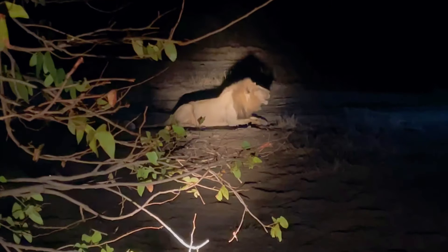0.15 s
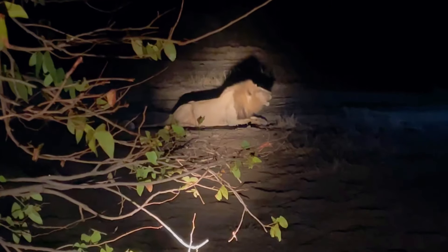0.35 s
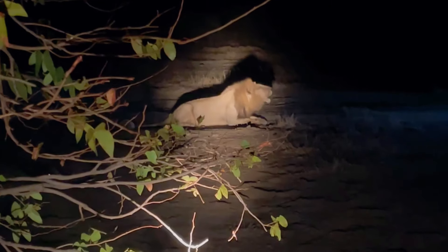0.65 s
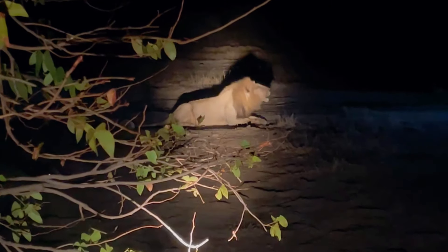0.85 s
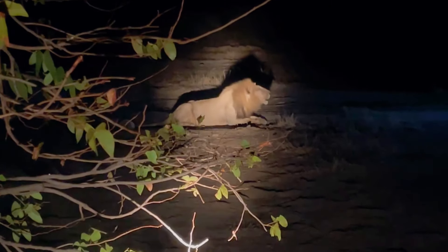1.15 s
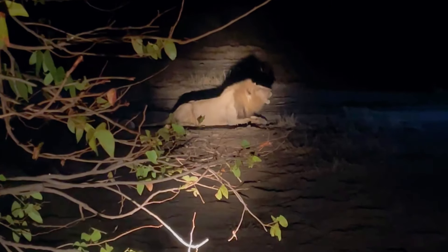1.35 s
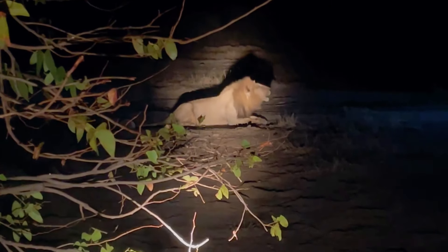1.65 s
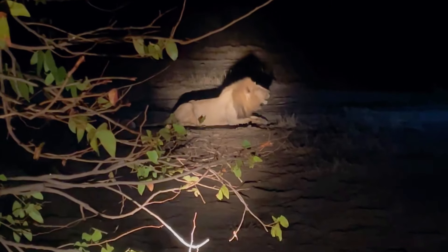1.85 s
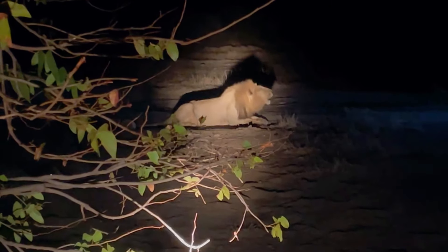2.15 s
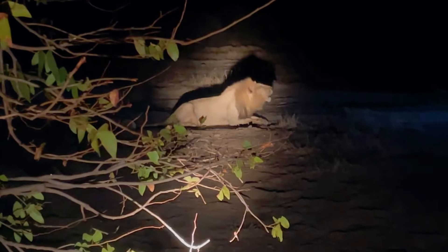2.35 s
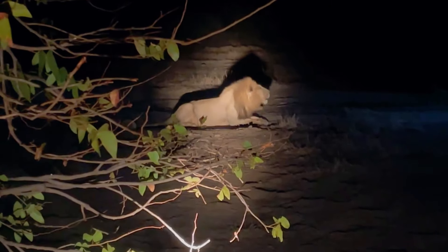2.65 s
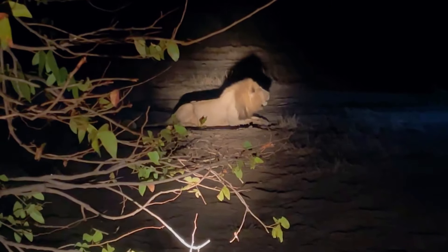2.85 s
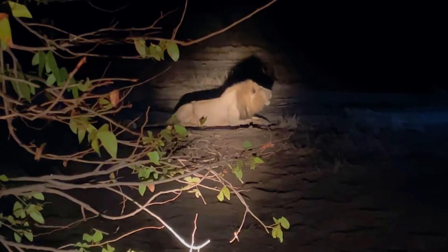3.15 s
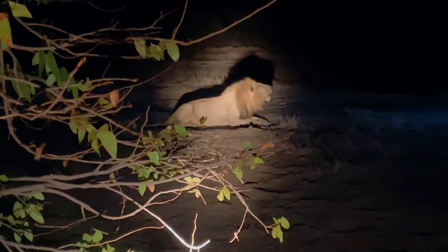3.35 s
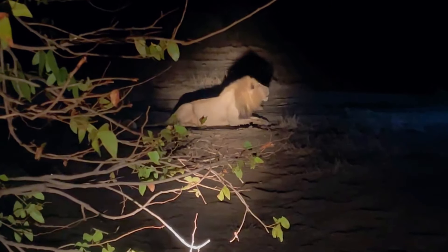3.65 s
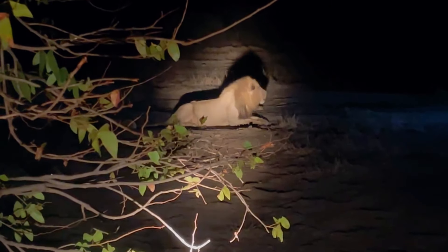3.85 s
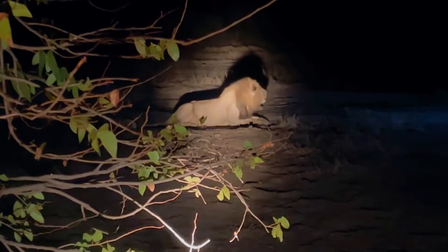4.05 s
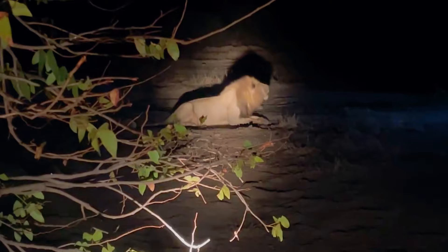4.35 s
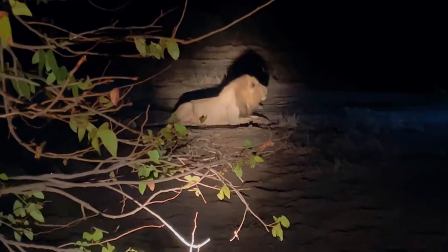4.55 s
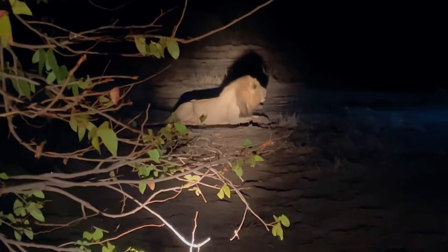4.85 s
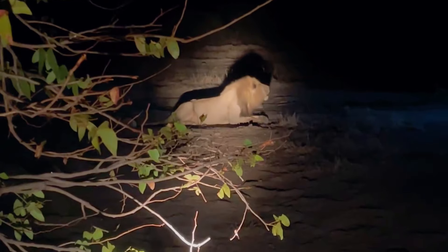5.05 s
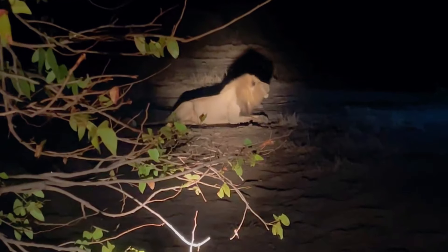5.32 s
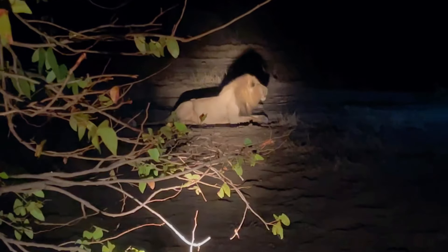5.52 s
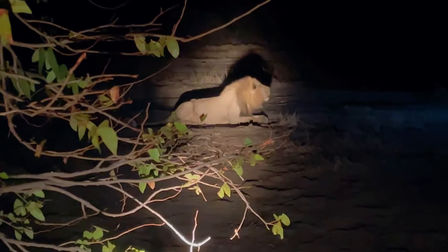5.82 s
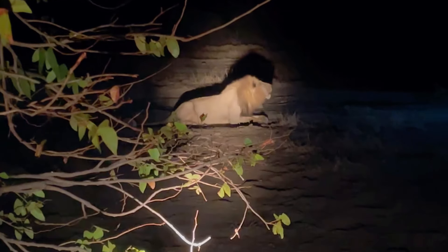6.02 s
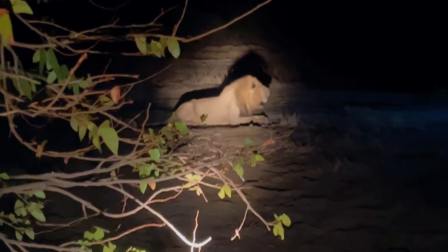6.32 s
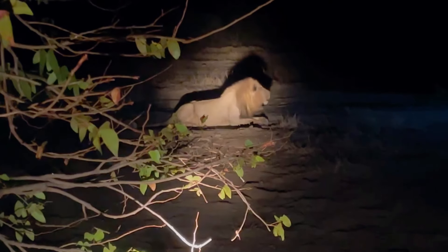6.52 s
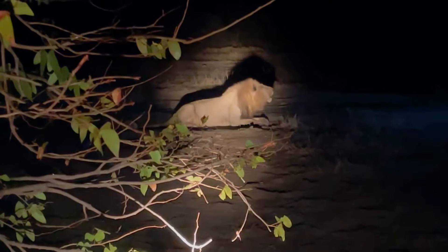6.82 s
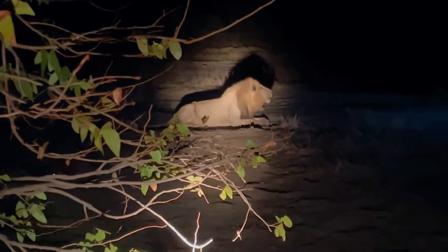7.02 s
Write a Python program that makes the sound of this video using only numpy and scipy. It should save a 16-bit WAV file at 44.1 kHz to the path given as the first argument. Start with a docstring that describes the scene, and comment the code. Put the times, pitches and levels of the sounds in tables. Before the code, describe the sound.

Quiet open bush at night, with faint low rumble and slight microphone hiss. The tail of an earlier growl dies away in the first 0.3 s, with small hollow pips around 0.1 and 0.2 s and a soft falling knock near 0.27 s. A close lion then grunts at about 0.45, 1.3, 2.1, 3.1, 4.1, 5.0 and 5.8 s, each preceded by a short snorted, snoring intake. Every grunt leaps into a deep tone near 145 Hz, swells within a tenth of a second, then sinks and breaks into slow flapping growl pulses, with throaty, nasal rough air. The one at 5.8 s sags lower into a longer rattle. At 6.6 s a last, much weaker grunt comes without an intake, all growl, ending near 7 s. A long, low, faint echo follows the calls, while frog-like pips near 740 Hz tick sparsely, slightly left, in the gaps.

```python
"""Night in open bush: the last growl of an earlier grunt dies away, short hollow pips and a soft knock are heard.
A lion then gives a run of deep grunts, all but the last after a short snorted intake of air. In all but the
last, a low tone leaps up, swells, and gives way to slow growl pulses; the last is weak and growl throughout.
Rough air rings throat and nose; the bush returns a long low echo, over a faint night rumble with more pips.
Tone is a wandering sine, growl is pulses through resonances, air is gusty noise, echo is sparse reflections."""
import sys
import numpy as np
from scipy import signal
from scipy.fft import rfft, irfft, next_fast_len
from scipy.io import wavfile
from scipy.ndimage import uniform_filter1d, minimum_filter1d

SR = 44100
rng = np.random.default_rng(int(sys.argv[2]) if len(sys.argv) > 2 else 0)


def transcribe(u):
    """Save the signal u as a 16-bit wav file named by the first command-line argument.

    u: samples, shape (n,) or (channels, n), limited to [-1, 1]; the rate is SR.
    q: integer samples, one column per channel.
    """
    v = np.clip(np.atleast_2d(u).T, -1, 1)
    q = np.round(v * 32767).astype(np.int16)
    wavfile.write(sys.argv[1], SR, q)


N = 316632

# grunts: (start [s], full effort [s], break [s], fade [s], effort at its full [dB], at the break [dB],
#   after the break [dB], pitch at full effort [Hz], at the break [Hz], at the fade [Hz], throat rasp [dB],
#   nose rasp [dB], hiss [dB], boost of nose resonances above 1 kHz [dB], effort after the leap [dB], release [s],
#   length of the break [s], effort at the fade [dB], effort under which tone gives way to growl [dB])
GRUNT_ROWS = [(.45, 0.558, 0.69, .81, -6, -4.5, -16.5, 146.8, 134.3, 126, -26, -26, -40, -2, -17, .08, 0.033, -22.5, -11.5),
              (1.299, 1.431, 1.437, 1.59, -5, -4, -9.5, 148.2, 144.6, 135, -25, -28, -39.5, -0.5, -15, 0.084, 0.019, -19, -13),
              (2.119, 2.275, 2.412, 2.5, -4, -14.5, -23.5, 145.1, 124, 136, -26, -25.5, -40.5, -1.5, -15, .08, .045, -30.5, -14),
              (3.099, 3.24, 3.455, 3.59, -4.5, -8, -18, 152.9, 134, 100, -24, -27.5, -44, -1, -14, .1, 0.039, -25, -10.5),
              (4.118, 4.229, 4.29, 4.455, -7, -8, -17.5, 145.6, 130, 112, -22.5, -32, -44, -0.5, -17, .06, 0.066, -23.5, -15.5),
              (4.979, 5.071, 5.205, 5.31, -7, -8, -19.5, 162.8, 138, 122, -25, -35.5, -50, 1.5, -12.5, 0.09, .04, -22.5, -12.5),
              (5.821, 5.933, 6.05, 6.335, -6.5, -9.5, -22, 139.3, 133, 73, -24.5, -33.5, -49.5, 1.5, -16, .04, 0.085, -34.5, -15.5),
              (6.632, 6.739, 6.79, 6.89, -22, -27, -31.5, 132.4, 128, 131, -30, -32.5, -44.5, 3, -28.5, .11, .03, -31.5, -14)]
# last growl of an earlier grunt: (length [s], effort [dB], fade [dB/s], pitch [Hz],
#   throat rasp, nose rasp, hiss re effort [dB])
EARLIER_GROWL = (0.3, -41, 116, 149, -12, -24, -44.5)
# brief dips of the tone: (time [s], depth [dB], length [s])
TONE_CATCHES = [(.636, 11.5, 0.0035), (1.419, 6.5, 0.01), (1.481, 8, 0.0083), (1.541, 7, .0042),
                (2.195, 7, .011), (2.23, 4, .011), (3.185, 10, .012), (3.233, 7, .013), (3.35, 9.5, .0041),
                (4.206, 17.5, 0.005), (4.256, 7.5, 0.0049), (4.323, 7, 0.0039), (5.053, 8, 0.0072),
                (5.096, 6, .022), (5.11, 11, .0073), (5.148, 12, .0076), (5.169, 6.5, .0036),
                (5.214, 22.5, .012), (5.895, 7.5, .005), (5.919, 21, 0.0054), (5.973, 12.5, .006),
                (5.996, 7, .012), (6.084, 7.5, 0.012), (6.131, 12.5, 0.013)]
# harsh bursts of air, and lulls: (time [s], throat change [dB], nose change [dB], hiss change [dB], length [s])
AIR_BURSTS = [(0.492, 1, 1, 1.5, .04), (0.587, -3, 2, 3, 0.035), (0.665, 2, -2.5, -3, 0.061),
              (0.706, 4, 6, 5.5, 0.064), (0.781, 5, 4.5, 6, 0.048), (0.822, 5, -1.5, -2, .05),
              (1.329, -0.5, 7, 4.5, 0.022), (1.432, 6, 9, 6, 0.07), (1.545, 4, 11.5, 6.5, 0.045),
              (1.585, 5.5, -3, -5.5, 0.036), (2.181, 6.5, 2, 2, 0.015), (2.384, 5.5, 8.5, 9.5, .04),
              (2.448, 5, -1.5, -1.5, 0.066), (2.506, -3.5, 6.5, 7, 0.057), (3.148, -1.5, -1, 2.5, .03),
              (3.22, 1, 6, 4.5, 0.033), (3.267, 3, 5.5, 6, 0.08), (3.426, 7, 10.5, 10, .06),
              (3.506, 6.5, 8.5, 9.5, 0.087), (4.244, 1.5, 5.5, 1.5, 0.073), (4.338, 4, 5, 6.5, 0.037),
              (4.444, -1, 0, 2.5, .04), (4.476, 10, 8, -2, 0.026), (5.057, -1.5, 6, 0, 0.017),
              (5.18, 10.5, 15.5, 14.5, .045), (5.276, 2.5, 2.5, 10, 0.087), (5.322, 7.5, 4.5, 2, 0.058),
              (5.852, 0.5, 3.5, 5, .012), (5.893, 5, 8, 2.5, .03), (5.956, 3.5, -0.5, 1, .04),
              (6.009, 6, 11.5, 11, 0.0487), (6.079, -6.5, -3.5, 4.5, 0.077), (6.136, 5.5, 9.5, 10.5, 0.045),
              (6.213, 9.5, 9, -8.5, 0.03), (6.25, -4, -7.5, -14, 0.052), (6.286, 4.5, 7.5, -14, 0.022),
              (6.32, 11, 3, -15, 0.022), (6.687, 2, 4.5, -0.5, 0.009), (6.721, 8, 10, 1.5, 0.025),
              (6.759, 4, 7.5, 2.5, 0.06), (6.784, 8.5, 4, 0.5, 0.0203), (6.857, 5, 7, 6.5, 0.054)]
# intakes of air: (start [s], strongest [s], end [s], nose air [dB], snore [dB], snore pitch [Hz])
INTAKE_ROWS = [(0.289, 0.368, .445, -46, -32, 118), (1.15, 1.197, 1.27, -48.5, -36.5, 145.5),
               (1.971, 2.017, 2.085, -46.5, -38, 135.7), (2.893, 3.009, 3.08, -45.5, -30, 149.2),
               (4.009, 4.038, 4.09, -57.5, -41, 137.3), (4.852, 4.896, 4.96, -51.5, -33, 136.1),
               (5.721, 5.752, 5.81, -55, -41, 143)]
# throat resonances: (centre [Hz], pole width [Hz], level [dB])
THROAT_MODES = [(257.2, 54, 3.5), (345, 73, 2), (423, 40, 0.5), (526, 64, -1)]
# nose resonances: (centre [Hz], pole width [Hz], level [dB])
NOSE_MODES = [(690.2, 56, -0.5), (730, 93, -7.5), (810, 27, -1.5), (896, 100, -8.5), (1039.3, 65, -5.5),
              (1174, 91, -9), (1293, 120, -15.5)]
# resonances at the teeth: (centre [Hz], pole width [Hz], level [dB])
TEETH_MODES = [(2440, 1600, -2), (2860, 140, -0.5), (3296, 590, -3.5), (4900, 1000, -6)]
# relative spectrum of the breath hiss: (frequency [Hz], density [dB per Hz])
HISS_SPECTRUM = [(880, -37.5), (1500, 6), (1810, 0), (2210, 3), (2860, -4), (4220, -3), (5010, -18),
                 (5720, -11), (7250, -11), (8600, -21.5), (12700, -21.5), (14500, -42.5)]
# phase-shifted share between the microphones: (frequency [Hz], share [dB])
LEAD_SHARE = [(60, -14.5), (250, -15), (700, -9), (1500, -10), (6000, -3.5), (14000, -0.5)]
# scattered share, opposite in left and right: (frequency [Hz], share [dB])
SCATTER_SHARE = [(300, -25.5), (700, -11), (2000, -9.5), (5000, -7), (8000, -1.5), (14000, -4)]
# decay of the bush echo: (frequency [Hz], T60 [s])
BUSH_T60 = [(60, 1.1), (140, 1.14), (250, 1.2), (700, 0.23), (1500, 1.6), (5000, 0.58)]
# hollow pips, perhaps a frog: (time [s], approximate peak before panning [dB])
PIP_EVENTS = [(0.109, -53), (0.204, -55), (0.941, -57), (1.045, -56), (1.136, -52.5), (1.219, -63),
              (1.709, -53), (1.889, -65), (2.804, -49.5), (2.892, -55), (3.718, -56.5), (3.811, -57),
              (3.912, -52.5), (4.003, -53), (4.555, -54), (4.641, -53.5), (4.729, -58.5), (4.837, -52.5),
              (5.604, -56), (5.657, -48.5), (6.404, -54.5), (6.509, -61)]
# soft knock: (time [s], level before its soft onset [dB], start pitch [Hz], end pitch [Hz],
#   glide time constant [s], T60 [s])
KNOCK = (.267, -13, 700, 88, .004, .11)
# relative spectrum of the night: (frequency [Hz], density [dB per Hz])
NIGHT_SPECTRUM = [(18, -33.5), (30, -15.5), (80, 8), (112, -19), (161, -17), (503, -29.5), (780, -10),
                  (911, -22.5), (1210, -33), (1930, -42.5), (2080, -45), (4770, -47), (5870, -50),
                  (12700, -47), (14500, -51)]
# left-right likeness of the night: (frequency [Hz], correlation [0-1])
NIGHT_LIKENESS = [(60, 0.55), (240, 0.48), (930, 0.2), (3660, 0.66), (14400, 0.11)]

SILENT_DB, ATTACK_S, RELEASE_DB = -45.5, 0.043, 28
LEAD_S, LEAD_DB = 0.035, -20  # faint breath ahead of the leap
AIR_START_DB = -24  # rasp at the leap, re its level
ONSET_SHARP = 1.05  # onset pitch re pitch at full effort
EARLY_SHARE = 0.29  # how far throat and nose rasp follow effort before its full
# (attack [s], share of the fall in effort, loss as breath runs out [dB/s])
THROAT_LAW, NOSE_LAW, HISS_LAW = (0.035, 0.87, 18), (0.038, 0.61, 35.4), (0.04, 0.85, 10)
SNORE_LAG_S, INTAKE_START_DB, INTAKE_END_DB = 0.022, -16, -20.5
INTAKE_THROAT_DB, INTAKE_HISS_DB = -2, -11.5  # re nose air
BUSH_DB, NIGHT_DB = -36, -56
PIP_HZ = 733  # lowest pip pitch
EDGE_HZ = 14900  # upper band limit


def grunt(start_s, full_s, break_s, fade_s, full_db, break_db, after_db, full_hz, break_hz, fade_hz,
          throat_db, nose_db, hiss_db, upper_db, leap_db, release_s, breaking_s, fade_db, growl_below_db):
    """Effort leaps to its full, drops at the break and lets go; rasp sinks as the breath runs out."""
    t = np.arange(start_s - LEAD_S, fade_s + release_s, 1 / SR)
    effort_s = [start_s, start_s + ATTACK_S, full_s, break_s, break_s + breaking_s, fade_s, fade_s + release_s]
    onset_db = min(SILENT_DB, full_db - RELEASE_DB)
    levels_db = [onset_db, leap_db, full_db, break_db, after_db, fade_db, fade_db - RELEASE_DB]
    effort_db = np.interp(t, effort_s, levels_db)
    effort_db += np.interp(t, [start_s - LEAD_S, start_s], [LEAD_DB, 0])
    pitch_hz = np.interp(t, [start_s, full_s, break_s, fade_s], [ONSET_SHARP * full_hz, full_hz, break_hz, fade_hz])

    # throat and nose rasp are strong early; hiss follows effort throughout
    fall_db = effort_db - full_db
    late_db = fall_db * np.where(t > full_s, 1, EARLY_SHARE)
    parts = [(throat_db, late_db, THROAT_LAW), (nose_db, late_db, NOSE_LAW), (hiss_db, fall_db, HISS_LAW)]
    rasp_db = []
    for column, (level_db, air_db, (attack_s, share, loss_db_per_s)) in enumerate(parts, start=1):
        rise_s = [start_s - LEAD_S, start_s, start_s + attack_s]
        rise_db = np.interp(t, rise_s, [AIR_START_DB + LEAD_DB, AIR_START_DB, 0])
        burst_db = bumps(t, [(row[0], row[column], row[-1]) for row in AIR_BURSTS])
        rasp_db.append(level_db + rise_db + share * air_db - loss_db_per_s * (t - start_s) + burst_db)
    return call(t, effort_db, pitch_hz, *rasp_db, upper_db=upper_db, growl_below_db=growl_below_db)


def intake(start_s, top_s, end_s, air_db, snore_db, snore_hz):
    """Air drawn through the nostrils rings their upper resonances more; a low snore follows just behind."""
    t = np.arange(start_s, end_s + SNORE_LAG_S, 1 / SR)
    shape_s, shape_db = np.array([start_s, top_s, end_s]), [INTAKE_START_DB, 0, INTAKE_END_DB]
    air_db = air_db + np.interp(t, shape_s, shape_db)
    snore_db = snore_db + np.interp(t, shape_s + [0, SNORE_LAG_S, SNORE_LAG_S], shape_db)
    return call(t, snore_db, snore_hz, air_db + INTAKE_THROAT_DB, air_db, air_db + INTAKE_HISS_DB, upper_db=8.0)


def earlier_growl(length_s, level_db, fade_db_per_s, hz, *rasp_db):
    """The dying end of the grunt before: growl and rasp fall together."""
    t = np.arange(0, length_s, 1 / SR)
    effort_db = level_db - fade_db_per_s * t
    return call(t, effort_db, hz, *(effort_db + under_db for under_db in rasp_db))


def call(t, effort_db, hz, throat_db, nose_db, hiss_db, upper_db=0, growl_below_db=-12.0, span_db=6.5):
    """One breath: steady tone at high effort, growl pulses at low effort, rough air on top."""
    # tense folds lock to the throat while a strong breath builds; slack ones flap slowly
    building = (t < t[np.argmax(effort_db)]) & (effort_db.max() > growl_below_db)
    growl = np.clip((growl_below_db - effort_db) / span_db, 0, 1) * ~building

    # a catch dips the tone and raises its pitch 2.7 Hz per dB
    catch_db = bumps(t, TONE_CATCHES)
    cycles = np.cumsum(hz * (1 + 0.027 * wander(t, 63)) + 2.7 * catch_db) / SR
    tone = np.sqrt(2) * gain_of(0.7 * wander(t, 40) - catch_db) * np.sin(2 * np.pi * cycles)
    # uneven cycles spread above the tone
    flutter = evened(resonate(rng.standard_normal(len(t)), 1.293 * hz, 44, order=2))

    # slow slaps ring the lowest resonance and thud in the chest
    slaps = np.cumsum(31 * (1 + 0.27 * wander(t, 30))) / SR
    pulses = np.diff(np.floor(slaps), prepend=0) * gain_of(2.2 * wander(t, 40))
    pulses = evened(pulses) + 0.22 * rng.standard_normal(len(t))
    rung = evened(resonate(pulses, hz, 62, order=2))
    chest = evened(resonate(pulses, 0.68 * hz, 55, order=3))
    voice = np.sqrt(1 - growl) * tone + 0.21 * flutter
    voice += np.sqrt(growl) * (0.96 * rung + 0.24 * chest) + 0.0083 * chest

    # air puffs with every cycle, with every slap, and in uneven gusts
    puffs = (1 + 0.15 * np.cos(2 * np.pi * cycles)) * (1 + 1.1 * growl * np.exp(-(slaps % 1) / 0.3))
    air = evened(puffs * gain_of(1.7 * wander(t, 34)) * rng.standard_normal(len(t)))
    # one click a cycle gives faint overtones
    closures = evened(np.diff(np.floor(cycles), prepend=0)) * (1 - growl)
    buzz = air + 0.8 * closures
    hiss = evened(colour(air, HISS_SPECTRUM)) + 0.5 * ring(air, TEETH_MODES, t, patchy_db=2.6, drift=0.025)
    nose_modes = [(f, width, db + upper_db * (f > 1000)) for f, width, db in NOSE_MODES]
    rasp = gain_of(throat_db) * ring(buzz, THROAT_MODES, t)
    rasp += gain_of(nose_db) * ring(buzz, nose_modes, t)
    rasp += gain_of(hiss_db) * evened(hiss)
    breath = gain_of(effort_db) * voice + rasp
    return t[0], breath * signal.windows.tukey(len(t), 0.1)


def ring(air, modes, t, patchy_db=3.2, drift=0.014):
    """Air in a set of resonances; each drifts and flares by itself as tongue and lips move."""
    total = 0
    for hz, width_hz, level_db in modes:
        flare = gain_of(level_db + patchy_db * wander(t, 12))
        total = total + flare * resonate(air, hz * (1 + drift * wander(t, 5)), width_hz, order=2)
    return evened(total)


def near(lion):
    """The voice reaches the right ahead in phase, rasp near 680 Hz leans left, scattered treble drifts."""
    quarter_turn = signal.hilbert(lion, next_fast_len(N))[:N].imag
    lead = colour(quarter_turn, LEAD_SHARE)
    lean = 0.41 * resonate(lion, 680, 350, order=2)
    scatter = colour(lion * wander(lion, 30), SCATTER_SHARE)
    side = lead + lean + scatter
    return np.array([lion + side, lion - side])


def bush(lion):
    """Far trees and banks return the grunts; an earlier grunt is still dying away at the start."""
    lead = round(0.86 * SR)
    earlier = lion[:lead] * gain_of(4.5)  # the opening stands in for it
    source = np.concatenate([earlier, lion])
    middle, side = signal.fftconvolve(source[None], tail(BUSH_T60, 0.1), axes=1)[:, lead:lead + N]
    return gain_of(BUSH_DB) * (middle + 0.25 * side * np.array([[1], [-1]]))


def tail(t60, first_s):
    """Two sparse trains of reflections from first_s on, each band dying at its own speed."""
    taps = np.zeros((2, 2 * SR))
    slots = np.arange(round(first_s * SR), 2 * SR - 20, 20)
    at = slots + rng.integers(0, 20, (2, len(slots)))
    np.put_along_axis(taps, at, rng.choice([-1., 1.], at.shape), 1)
    hz, t, bands = signal.stft(taps, SR, nperseg=1024)
    decay = gain_of(-60 * t / read(t60, hz)[:, None])
    out = signal.istft(bands * decay, SR, nperseg=1024)[1]
    return out / np.linalg.norm(out[0])


def small_sounds():
    """Pips are decaying sines with a rise of a few ms, left of centre; one soft knock falls in pitch."""
    pips, knock, t = np.zeros(N), np.zeros(N), np.arange(4000) / SR
    pitches_hz = PIP_HZ * rng.uniform(1.0, 1.03, len(PIP_EVENTS))
    for (time_s, peak_db), hz in zip(PIP_EVENTS, pitches_hz):
        envelope = gain_of(peak_db - 60 * t / 0.074) * (1 - np.exp(-t / 0.0013))
        add(pips, time_s, envelope * 1.43 * np.sin(2 * np.pi * hz * t))  # 1.43 restores the peak
    time_s, level_db, start_hz, end_hz, glide_s, t60_s = KNOCK
    cycles = np.cumsum(end_hz + (start_hz - end_hz) * np.exp(-t / glide_s)) / SR
    envelope = gain_of(level_db - 60 * t / t60_s) * (1 - np.exp(-t / 0.014)) ** 2
    add(knock, time_s, envelope * np.sin(2 * np.pi * cycles))
    return pips * gain_of([[2.5], [-2.5]]) + knock


def night():
    """Low rumble, a faint band near the pips and microphone hiss: shaped noise in drifting patches."""
    frames, hz = N // 512 + 5, np.fft.rfftfreq(2048, 1 / SR)
    a, b, c, d, patches = rng.standard_normal((frames, 1025, 5)).T
    patches = evened(uniform_filter1d(uniform_filter1d(patches, 8, 0), 6, 1))
    same = np.clip(read(NIGHT_LIKENESS, hz), -1, 1)[:, None]
    left = a + 1j * b
    right = same * left + np.sqrt(1 - same ** 2) * (c + 1j * d)
    bands = np.array([left, right]) * gain_of(read(NIGHT_SPECTRUM, hz)[:, None] + 2.2 * patches)
    return gain_of(NIGHT_DB) * evened(signal.istft(bands, nperseg=2048, noverlap=1536)[1][:, :N])


def gain_of(db):
    """Decibels to gain."""
    return 10 ** (np.asarray(db) / 20)


def evened(x):
    """Scales to rms 1."""
    return x / np.sqrt(np.mean(x ** 2) + 1e-20)


def read(points, hz):
    """Reads a curve on a log-frequency axis."""
    f, value = np.transpose(points)
    return np.interp(np.log(hz + 1), np.log(f + 1), value)


def add(mix, time_s, sound):
    """Mixes a sound in at time_s."""
    part = mix[round(time_s * SR):][:len(sound)]
    part += sound[:len(part)]


def colour(x, points):
    """Filters by a dB spectrum."""
    size = x.shape[-1]
    return irfft(rfft(x) * gain_of(read(points, np.fft.rfftfreq(size, 1 / SR))), size)


def resonate(x, hz, width_hz, order=1):
    """Shifts the curve hz down to zero, smooths, and shifts back: a resonance of gain 1."""
    turn = np.exp(2j * np.pi * np.cumsum(hz * np.ones(len(x))) / SR)
    pole = np.exp(-np.pi * width_hz / SR)
    low = x / turn + 1e-18
    for _ in range(order):
        low = signal.lfilter([1 - pole], [1, -pole], low)
    return 2 * (turn * low).real


def wander(t, per_s):
    """Smoothed noise of rms 1 that changes about per_s times a second."""
    size = max(int(SR / per_s / 2), 1)
    return evened(uniform_filter1d(uniform_filter1d(rng.standard_normal(len(t)), size), size))


def bumps(t, events):
    """Sum of smooth dB bumps, one for each (time [s], height [dB], length [s]) within t."""
    total_db = np.zeros(len(t))
    for time_s, height_db, length_s in events:
        if t[0] < time_s < t[-1]:
            total_db += height_db * np.exp(-(2 * (t - time_s) / length_s) ** 2)
    return total_db


def scene():
    """Lion, its echoes, the night and the small sounds."""
    lion = np.zeros(N)
    add(lion, *earlier_growl(*EARLIER_GROWL))
    for row in GRUNT_ROWS:
        add(lion, *grunt(*row))
    for row in INTAKE_ROWS:
        add(lion, *intake(*row))
    # a mouth radiates little deep bass
    lion = signal.sosfilt(signal.butter(4, 58, "highpass", fs=SR, output="sos"), lion)
    return near(lion) + bush(lion) + night() + small_sounds()


def record(dry):
    """The microphone drops the deepest bass, a limiter holds the peaks, then the band limit."""
    thin = signal.sosfilt(signal.butter(2, 40, "highpass", fs=SR, output="sos"), dry)
    peak_gain = np.minimum(1, 0.97 / (abs(thin).max(0) + 1e-9))
    held = thin * uniform_filter1d(minimum_filter1d(peak_gain, size=441), size=441)
    band_limit = signal.firwin(1023, EDGE_HZ, window=("kaiser", 9), fs=SR)
    return signal.oaconvolve(held, band_limit[None], "same")


dry = scene()
out = record(dry)
transcribe(out)
```